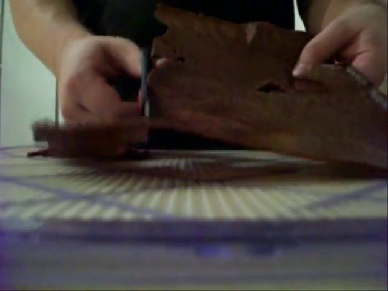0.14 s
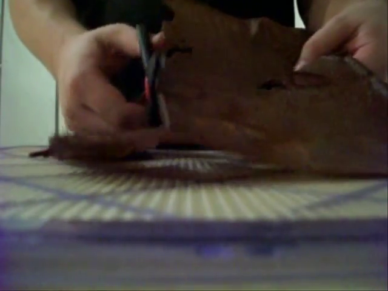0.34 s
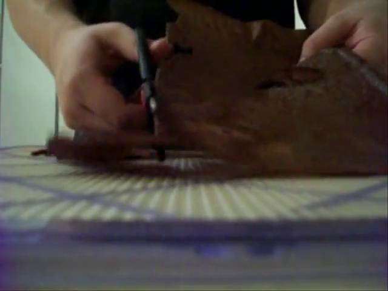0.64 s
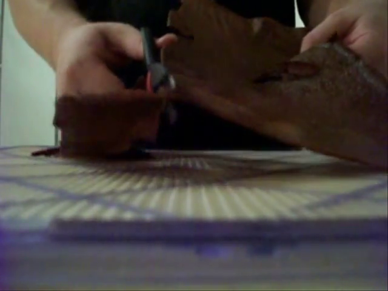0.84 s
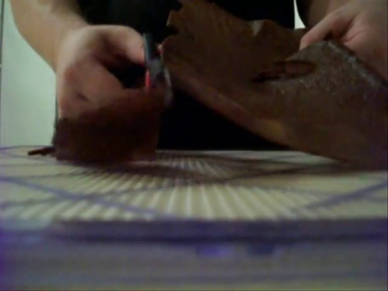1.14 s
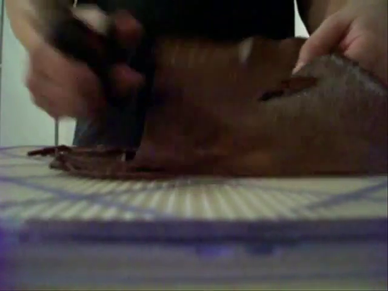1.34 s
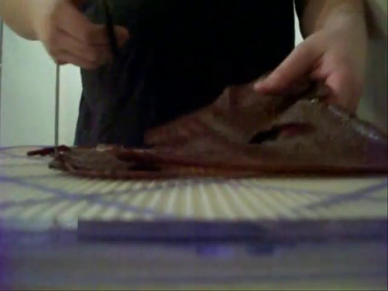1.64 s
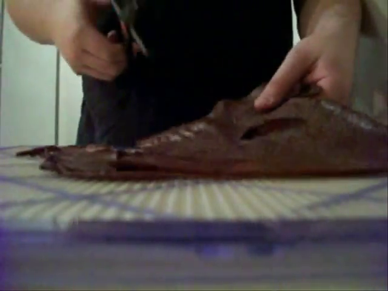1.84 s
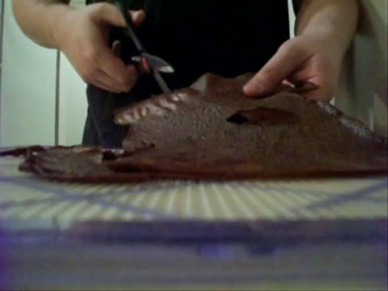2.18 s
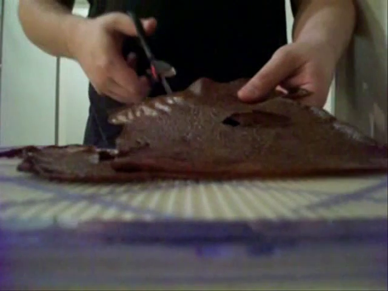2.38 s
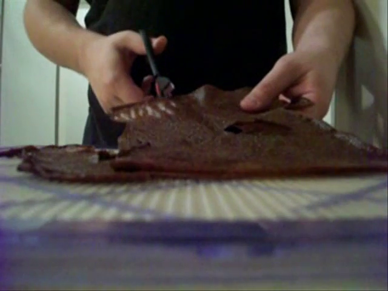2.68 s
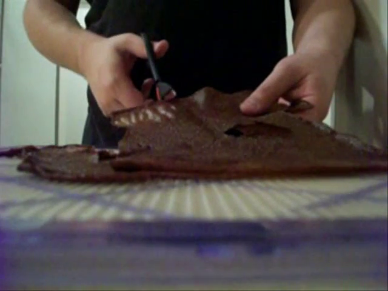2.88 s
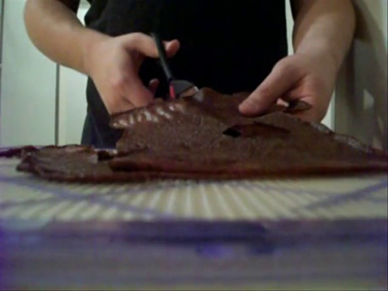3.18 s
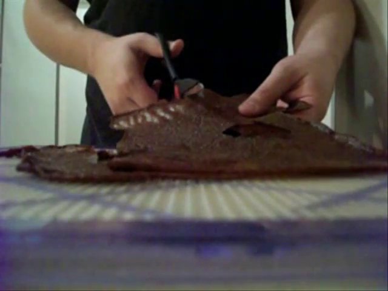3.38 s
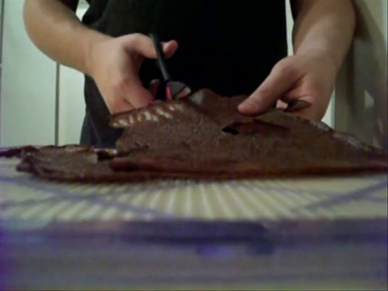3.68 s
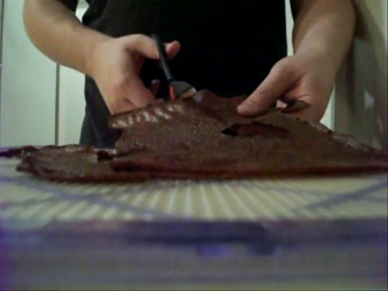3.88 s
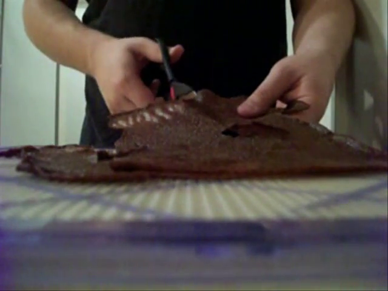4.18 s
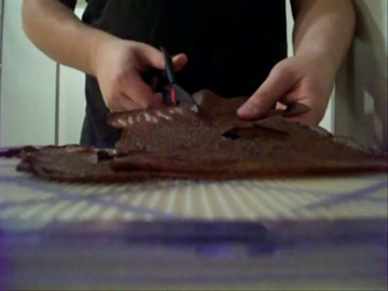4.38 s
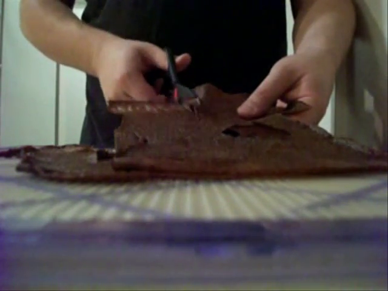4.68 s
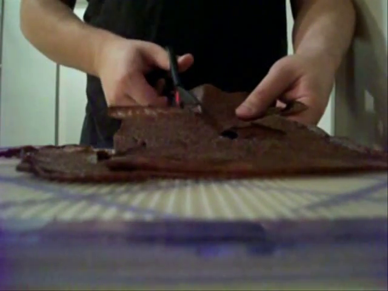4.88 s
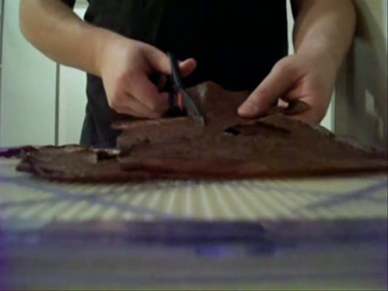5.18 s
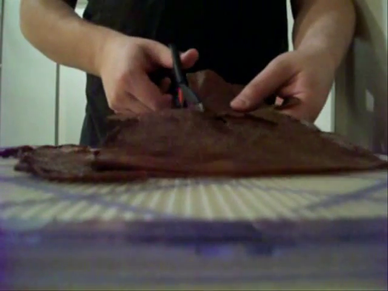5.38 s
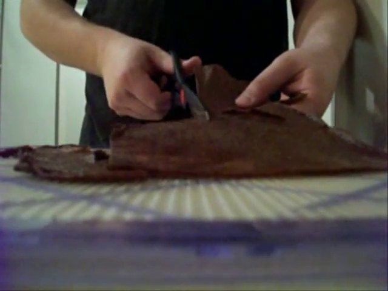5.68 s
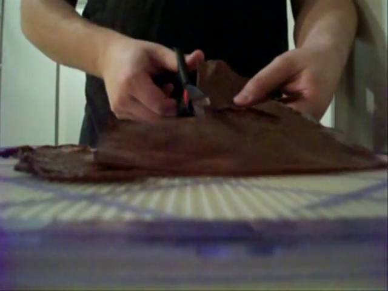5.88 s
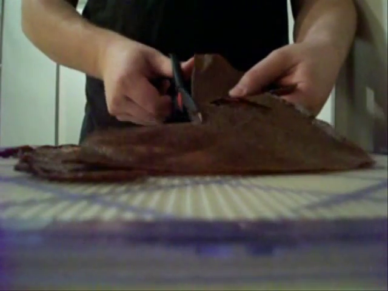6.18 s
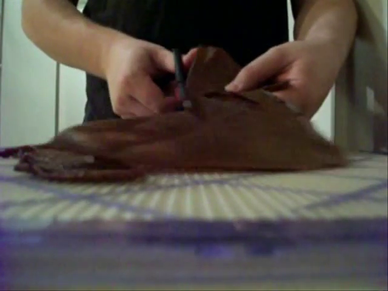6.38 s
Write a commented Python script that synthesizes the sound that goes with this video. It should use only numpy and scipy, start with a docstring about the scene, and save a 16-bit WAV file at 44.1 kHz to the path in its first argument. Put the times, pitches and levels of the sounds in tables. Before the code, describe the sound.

A low room hum and steady microphone hiss run throughout. From the start, a leathery sheet of dried fruit rustles and drags on a table, very close, while kitchen shears click and give three brief blade scrapes in the first second. At 0.5 seconds a hard knock makes the tabletop ring and boom. Near 1.25 seconds the shears snap shut with a loud steel click, followed at once by a second hard knock. Lighter rustles continue, with a soft bump near 2.2 seconds and small cuts around 2.6. From 3 to 3.8 seconds the blades crunch through a tough spot in short, raspy squeezes. A cluster of clicks comes near 4.4 seconds. From there to about 6.5 seconds the shears slice on in uneven rustling strokes, with more clicks and soft knocks near 5.1, 5.5, 6 and 6.2 seconds. The room echo is short and the highest treble is missing.

```python
"""Kitchen shears cutting fruit leather

Shears cut a sheet of dried fruit on a table, close to a small camera standing on the same top.
The blades crunch through in short strokes, scrape and click shut; the sheet rustles and drags.
Two hard knocks and some softer ones make the table ring and boom.
Under it all lie a low room hum and the hiss of a microphone that misses the highest treble."""
import sys
import numpy as np
from scipy import signal
from scipy.fft import rfft, irfft, next_fast_len
from scipy.io import wavfile
from scipy.ndimage import uniform_filter1d, map_coordinates

SR = 44100
rng = np.random.default_rng(int(sys.argv[2]) if len(sys.argv) > 2 else 0)


def persist_wave(psi):
    """Save psi, clipped to +-1, as 16-bit WAV."""
    counts = np.round(np.clip(psi, -1, 1) * 32767).astype(np.int16)
    wavfile.write(sys.argv[1], SR, np.atleast_2d(counts).T)


N = 288193


def amp(db):
    """Turn decibels into a gain."""
    return 10 ** (np.asarray(db) / 20)


def unit(x):
    """Scale x to an average power of 1."""
    return x / np.sqrt(np.mean(x ** 2) + 1e-20)


def along(points, hz):
    """Read between (frequency, value) points on a log frequency axis."""
    freqs, values = np.transpose(points)
    return np.interp(np.log(hz + 1), np.log(freqs + 1), values)


def add(track, start, sound):
    """Mix a sound in, start seconds into the track."""
    part = track[round(start * SR):][:len(sound)]
    part += sound[:len(part)]


def wobble(rate):
    """A smooth curve through rate random values a second."""
    return map_coordinates(rng.standard_normal(int(N * rate / SR) + 4), [np.arange(N) * rate / SR])


def filtered(x, response):
    """Multiply each frequency in x by response(hz)."""
    size = next_fast_len(len(x) + SR // 8)
    return irfft(rfft(x, size) * response(np.fft.rfftfreq(size, 1 / SR)), size)[:len(x)]


def coloured(x, spectrum):
    """Give x a tone colour, at power 1."""
    return unit(filtered(x, lambda hz: amp(along(spectrum, hz))))


def resonate(x, peaks):
    """Make x ring at (frequency [Hz], width [Hz], level [dB]) peaks, at power 1."""
    def response(hz):
        return sum((-1) ** k * amp(db) * 1j * hz * width / (centre ** 2 - hz ** 2 + 1j * hz * width)
                   for k, (centre, width, db) in enumerate(peaks))
    return unit(filtered(x, response))


def low_pass(x, edge_hz):
    """Cut steeply above the edge."""
    return filtered(x, lambda hz: 1 / np.sqrt(1 + (hz / edge_hz) ** 80))


def grains(rate, spread_db, clump_db):
    """Tiny slips and tears, about rate a second, uneven in size and swelling in clumps."""
    sizes = rng.standard_normal(N) * amp(spread_db * rng.standard_normal(N))
    slips = rng.random(N) < rate / SR
    return unit(slips * sizes * amp(clump_db * wobble(170)))


def patchy(x, depth_db):
    """The tone shifts as the sheet bends: small patches of pitch and time get louder or softer."""
    spectra = signal.stft(x, nperseg=512)[2]
    patches = uniform_filter1d(rng.standard_normal(spectra.shape), size=3, axis=0)
    patches = uniform_filter1d(patches, size=9, axis=1)
    return unit(signal.istft(spectra * amp(depth_db * unit(patches)), nperseg=512)[1][:N])


def strokes(rows, column, rise_s, fade_s):
    """A loudness curve from one level column: each stroke swells, holds, then fades by 60 dB."""
    t, power = np.arange(N) / SR, np.zeros(N)
    for row in rows:
        start, length = row[:2]
        age = t[:round((length + fade_s) * SR)]
        swell = np.sin(np.pi / 2 * np.clip(age / rise_s, 0, 1))
        level = amp(row[column] - 60 * np.maximum(age - length, 0) / fade_s)
        add(power, start, (swell * level) ** 2)
    return np.sqrt(power)


def chatter(t, length):
    """A short rattling contact, about equally strong at all frequencies."""
    grip = (1 - np.exp(-t / .0002)) / (1 + (t / max(length, .001)) ** 4)
    rattle = rfft(rng.standard_normal(len(t)) * grip)
    return irfft(rattle / (abs(rattle) + 1e-12), len(t)) * np.sqrt(grip)


# tone colours of the hum and the hiss: (frequency [Hz], relative level [dB])
HUM_COLOUR = [(15, 1), (30, 1.5), (65, -1), (90, -3.5), (120, -6.5), (240, -10), (350, -13), (490, -12.5),
              (620, -16), (1300, -16.5), (3000, -18), (4500, -23.5), (6000, -55), (7000, -77)]
HISS_COLOUR = [(1500, -40.5), (3500, -4), (4600, -2), (5400, -8.5), (6200, -18.5), (6800, -28.5),
               (7300, -57.5)]


def background():
    """The room hums low and the microphone hisses steadily."""
    hum = coloured(rng.standard_normal(N), HUM_COLOUR)
    hiss = coloured(rng.standard_normal(N), HISS_COLOUR)
    return amp(-36.5) * hum + amp(-48) * hiss


# tone colour of the rustle: (frequency [Hz], relative level [dB])
RUSTLE_COLOUR = [(100, -2.5), (400, -8.5), (900, -7.5), (1600, -3.5), (2400, -7), (3300, -2), (4700, -4.5),
                 (5500, -12), (6300, -21.5), (6900, -37.5), (7400, -72.5)]
# the table top's higher tones, also rung by knocks: (frequency [Hz], level [dB], time to fade 60 dB [s])
TABLE_TONES = [(441, -2, .24), (772, 0, .19), (1126, -1, .17), (1493, -7, .06), (1926, -10, .05),
               (2460, -9, .05), (2849, -12, .05)]
# the top's low sway under the hands: (frequency [Hz], width [Hz], relative level [dB])
TABLE_SWAY = [(94.6, 22, 2.5), (122.4, 47, -6.5), (159, 33, -12), (275, 65, -21.5)]
# the sheet's movements: (time [s], length [s], rustle level [dB], relative drag level [dB])
SHEET_MOVES = [(0.025, 0.053, -35, -37.5), (0.115, 0.11, -45.5, -48), (0.205, 0.033, -32.5, -38.5),
               (0.27, 0.088, -41, -39.5), (0.35, 0.058, -32, -34.5), (0.455, 0.033, -31, -42),
               (0.483, 0.031, -27.5, -28.5), (0.53, 0.098, -32, -31.5), (0.65, 0.066, -28, -32),
               (0.73, .15, -38, -36.5), (0.905, 0.025, -35, -35.5), (1.015, 0.093, -36.5, -38),
               (1.125, 0.048, -52, -41), (1.28, 0.036, -33, -28.5), (1.325, 0.034, -35.5, -40),
               (1.415, 0.067, -36, -34.5), (1.52, 0.14, -48.5, -48.5), (1.765, 0.088, -38, -40),
               (1.955, 0.094, -36.5, -42), (2.07, .045, -43, -38.5), (2.155, 0.022, -42.5, -49),
               (2.375, 0.035, -37.5, -44.5), (4.955, 0.059, -34.5, -38.5), (5.76, 0.13, -40.5, -40),
               (6.04, 0.12, -44.5, -45.5), (6.18, 0.082, -36.5, -38)]  # lifted, bent and slid
SHEET_CUTS = [(2.594, .091, -36.5, -47.5), (2.62, 0.021, -29.5, -50), (2.735, 0.016, -34.5, -55),
              (2.785, 0.047, -43, -47.5), (4.37, .055, -40, -40), (4.485, 0.04, -34, -42),
              (4.71, .055, -32, -48.5), (4.78, 0.11, -36.5, -48), (5.24, 0.083, -39, -44.5),
              (5.285, 0.15, -32, -40.5), (5.37, 0.029, -28, -36.5), (5.46, .045, -30, -40.5),
              (5.61, 0.034, -35, -37.5), (5.88, 0.055, -26.5, -32.5), (5.955, 0.066, -29.5, -39),
              (6.375, 0.066, -29, -39.5), (6.46, 0.031, -25.5, -39)]  # the blades slice along it


def sheet():
    """The leathery sheet rustles as it is moved and cut; where it drags, it shakes the table."""
    grip = amp(1.7 * wobble(rate=35))  # the sticky fruit holds and gives

    def loudness(column):
        moves = strokes(SHEET_MOVES, column, rise_s=0.019, fade_s=0.27)
        cuts = strokes(SHEET_CUTS, column, rise_s=0.012, fade_s=0.18)
        return grip * np.hypot(moves, cuts)

    crinkle = coloured(grains(rate=7000, spread_db=2.0, clump_db=2.5), RUSTLE_COLOUR)
    rustle = loudness(column=2) * patchy(crinkle, depth_db=2)
    # the sheet lying on the table damps its tones, making each peak twice as wide
    damped = [(hz, 2 * np.log(1000) / np.pi / fade_s, db) for hz, db, fade_s in TABLE_TONES]
    top = resonate(grains(rate=2000, spread_db=0.5, clump_db=5.5), damped)
    sway = resonate(rng.standard_normal(N), TABLE_SWAY)
    drag = loudness(column=3) * (amp(-0.5) * top + amp(2.5) * sway)
    return rustle + drag


# where the blades ring: (frequency [Hz], width [Hz], relative level [dB])
BLADE_PEAKS = [(2320, 830, -20.5), (3050, 230, 2.5), (4320, 246, 6.5), (4750, 200, 5.5), (5180, 360, 1),
               (5995, 140, -7), (5800, 85, -18.5)]
# tone colour of the handles' clack: (frequency [Hz], relative level [dB])
HANDLE_COLOUR = [(100, -14.5), (500, -0.5), (1000, 2.5), (2000, 6), (3500, 5), (4800, -14), (5800, -27.5),
                 (6600, -23.5), (7300, -67.5)]
# steel contacts: (time [s], level [dB], length [s], share of dull handle sound [0-1])
SHEAR_CLICKS = [(0.347, -29, 0.0038, 0.87), (0.38, -30, 0.011, 0.1), (0.656, -22.5, 0.0039, 0),
                (0.82, -27.5, 0.006, 0.6), (1.2438, -12.5, 0.0041, 0.33), (1.2462, -9.5, 0.0049, 0.36),
                (1.256, -25.5, 0.023, 0.22), (1.28, -22.5, 0.02, 0.3), (1.3363, -19, 0.003, 1),
                (1.366, -27, 0.0039, 1), (1.652, -32, 0.0038, 1), (2.155, -26.5, 0.018, 0.91),
                (2.596, -33, 0.0044, 0.5), (2.741, -29, 0.0025, 0.9), (2.985, -31, 0.002, 0.5),
                (3.009, -29.5, 0.017, 0.5), (3.382, -31, 0.0073, 1), (3.556, -32.5, 0.0067, 0.99),
                (3.613, -31, 0.0036, 0.77), (4.111, -27.5, 0.0062, 0.52), (4.266, -33.5, 0.0064, 0.36),
                (4.353, -23.5, 0.0091, 0.04), (4.37, -25.5, 0.019, 0.07), (4.392, -20.5, 0.0063, 0.08),
                (5.08, -23.5, 0.0046, 0.3), (5.12, -30, 0.012, 0.46), (5.129, -25.5, 0.0063, 0.93),
                (5.618, -22, 0.0042, 0.37), (5.649, -31, 0.012, 0.76), (5.77, -30.5, 0.0024, 0.8),
                (6.414, -23, 0.01, 1)]


def clicks():
    """Steel meets steel: the blades, damped by the hand, ring briefly and the handles clack."""
    out, t = np.zeros(N), np.arange(SR // 10) / SR
    for start, db, length, dull in SHEAR_CLICKS:
        contact = chatter(t, length)
        ring = np.sqrt(1 - dull) * resonate(contact, BLADE_PEAKS)
        clack = np.sqrt(dull) * coloured(contact, HANDLE_COLOUR)
        add(out, start, amp(db) * np.sqrt(length / t[-1]) * (ring + clack))
    return out


# blade rubbing on blade: (time [s], length [s], level [dB], pitch [Hz])
BLADE_SQUEAKS = [(0.369, 0.032, -31.5, 3600), (0.484, 0.038, -32, 2930), (0.808, 0.062, -30, 3150)]


def squeaks():
    """One blade scrapes along the other, with a scratchy peak on each side of the pitch."""
    out = np.zeros(N)
    for start, length, db, hz in BLADE_SQUEAKS:
        n = round(length * SR)
        peaks = [(hz * 0.884, hz * 0.09, 0), (hz * 1.07, hz * 0.078, 0)]
        scrape = resonate(rng.standard_normal(n), peaks)
        add(out, start, amp(db) * signal.windows.tukey(n, .3) * scrape)
    return out


# tone colour of a blow's dull crack: (frequency [Hz], relative level [dB])
CRACK_COLOUR = [(60, -25), (200, 5), (380, -3.5), (600, 1), (780, 12.5), (960, -1), (1150, 8.5),
                (1700, -1.5), (2500, 0.5), (4000, -4), (4900, -8), (5800, -32.5), (6600, -28.5),
                (7300, -52.5)]
# blows on the table, at relative levels: (time [s], crack [dB], contact length [s], ring [dB], boom [dB])
TABLE_BLOWS = [(0.528, -4, 0.0041, -16, -6), (1.288, -11, 0.0076, -17.5, -12),
               (1.297, -32.5, 0.02, -31, -18), (2.159, -37, 0.014, -34, -25),
               (5.083, -23, 0.0069, -25.5, -52), (5.099, -30, 0.011, -43, -35),
               (5.492, -46, 0.0081, -44, -22.5), (6.014, -29, 0.0073, -44, -22.5),
               (6.212, -23, 0.0022, -30.5, -42)]


def knocks():
    """Shears and cut strip strike the table: a dull crack, then the top rings."""
    out, t = np.zeros(N), np.arange(SR // 2) / SR
    rise = 1 - np.exp(-t / 0.00035)
    drop = .5 + 0.41 * np.exp(-t / 0.021)  # much energy leaves the struck spot at once
    for start, crack_db, length, ring_db, _ in TABLE_BLOWS:
        crack = coloured(chatter(t, length), CRACK_COLOUR) * np.sqrt(length / t[-1])
        ring = np.zeros(len(t))
        for hz, db, fade_s in TABLE_TONES:
            level = amp(db + rng.normal(0, 0.39) - 60 * t / fade_s)
            ring += level * np.sin(2 * np.pi * (hz * t + rng.random()))
        add(out, start, amp(crack_db) * crack + amp(ring_db) * rise * drop * ring)
    return out


# the table top's lowest tones: (frequency [Hz], relative level [dB])
BOOM_TONES = [(86, -2.5), (116, -18.5), (154, -22), (180, -20.5)]


def booms(swell_s=0.031):
    """After each blow the whole top heaves and shakes the camera directly."""
    out, t = np.zeros(N), np.arange(SR // 2) / SR
    tones = sum(amp(db) * np.cos(2 * np.pi * hz * t) for hz, db in BOOM_TONES)
    heave = (t / swell_s * np.exp(1 - t / swell_s)) ** 2
    for start, *_, boom_db in TABLE_BLOWS:
        add(out, start, amp(boom_db) * heave * tones)
    return out


# where the blades ring with fruit between them: (frequency [Hz], width [Hz], relative level [dB])
CRUNCH_PEAKS = [(1005, 380, -3), (1500, 170, 2), (1960, 240, -1), (3190, 450, -2.5), (4550, 780, -4)]
# short squeezes into a tough spot: (time [s], length [s], relative level [dB])
TOUGH_BITES = [(2.985, 0.044, -29), (3.035, 0.086, -28.5), (3.379, .03, -27), (3.44, 0.044, -24.5),
               (3.608, 0.083, -28.5), (3.797, 0.041, -27), (4.495, 0.021, -30), (6.402, 0.03, -26)]


def bites():
    """The closing blades crunch through the tough fruit, fibre by fibre, with a hollow rasp."""
    fibres = resonate(grains(rate=4500, spread_db=2.0, clump_db=1.0), CRUNCH_PEAKS)
    rasp_colour = [(300, -18), (800, 1.5), (3000, 0), (4900, -3), (5600, -9), (6400, -5.5), (7200, -45)]
    rasp = patchy(coloured(fibres, rasp_colour), depth_db=2.5)
    return amp(-1) * strokes(TOUGH_BITES, column=2, rise_s=0.013, fade_s=0.068) * rasp


# how long the kitchen echoes: (frequency [Hz], time to fade 60 dB [s])
ECHO_TIMES = [(100, 0.4), (1000, 0.41), (6000, 0.057)]


def room_echo(x):
    """The kitchen's short echo, each frequency dying away at its own speed."""
    hz, t, spectra = signal.stft(rng.standard_normal(SR // 2), SR, nperseg=256)
    fade = amp(-60 * t / along(ECHO_TIMES, hz)[:, None])
    tail = signal.istft(spectra * fade, SR, nperseg=256)[1]
    delayed = np.pad(tail, (SR // 200, 0)) / np.linalg.norm(tail)
    return signal.fftconvolve(x, delayed)[:N]


def scene():
    """Shears, sheet and table in the kitchen, in one channel."""
    work = sheet() + clicks() + squeaks() + knocks() + bites()
    return (background() + work + booms() + amp(-13.5) * room_echo(work))[None]


def record(dry):
    """High treble is cut, a very faint high tone is added, and the hardest blows clip with a crackle."""
    offset, abruptness = -.0617, 22  # the wave rests a little below zero and clips sharply
    high_tone = amp(-88) * np.sin(2 * np.pi * 11025 * np.arange(N) / SR)
    x = low_pass(dry[0], edge_hz=6800) + offset + high_tone
    clipped = x / (1 + abs(x) ** abruptness) ** (1 / abruptness)
    return low_pass(clipped - offset, edge_hz=12425)[None] + offset


dry = scene()
out = record(dry)
persist_wave(out)
```